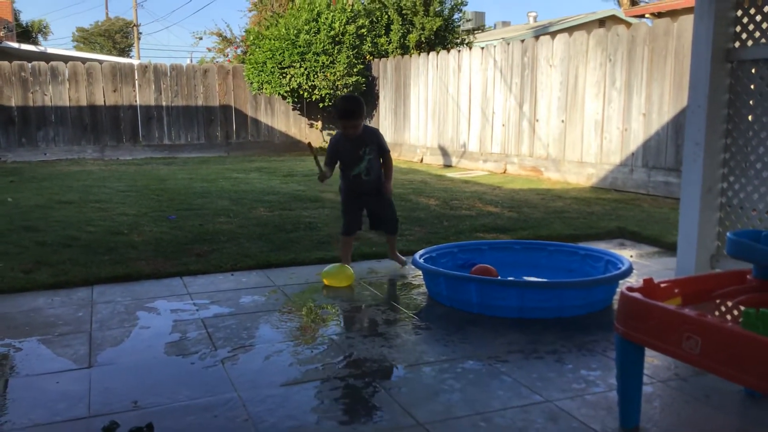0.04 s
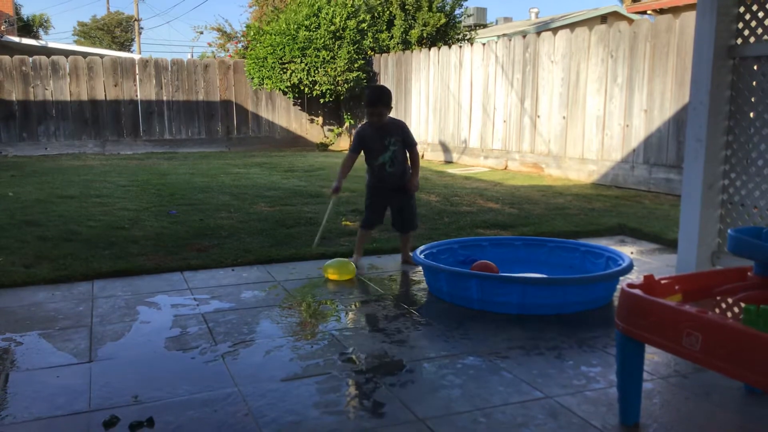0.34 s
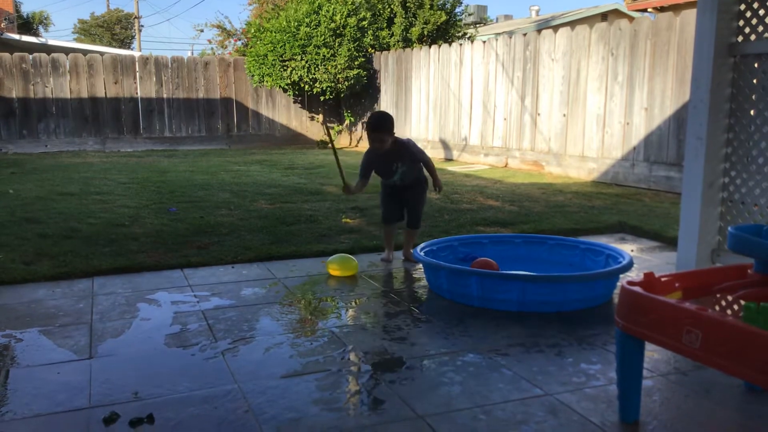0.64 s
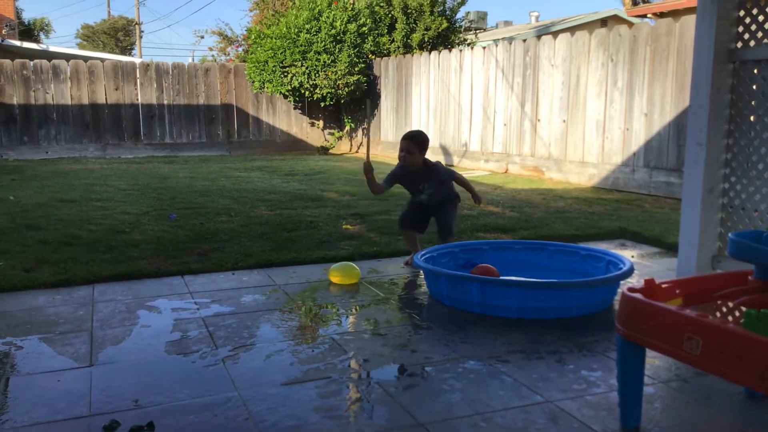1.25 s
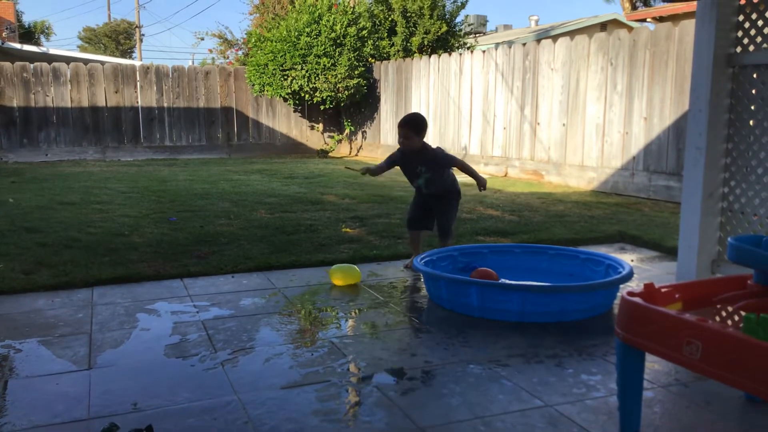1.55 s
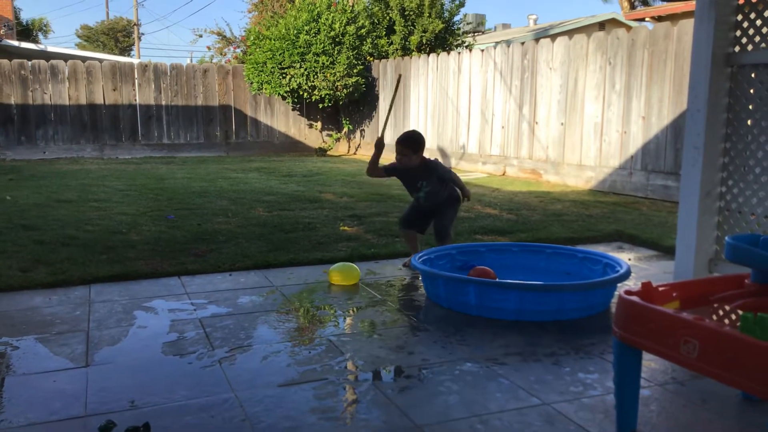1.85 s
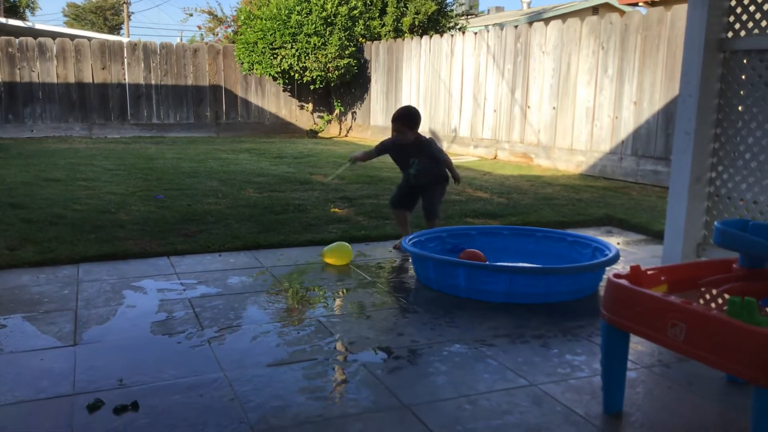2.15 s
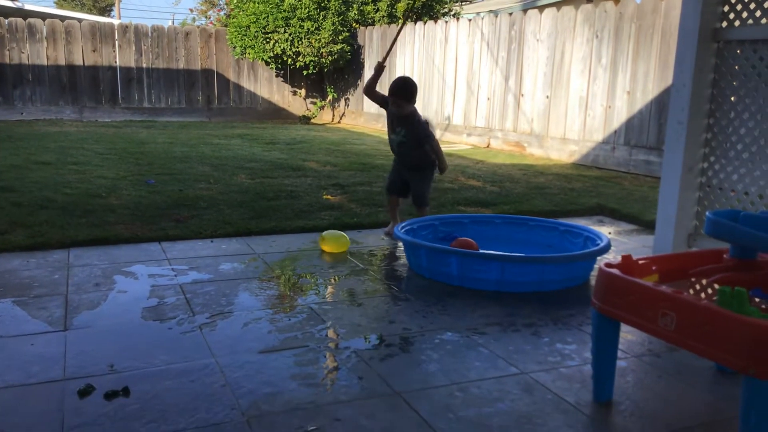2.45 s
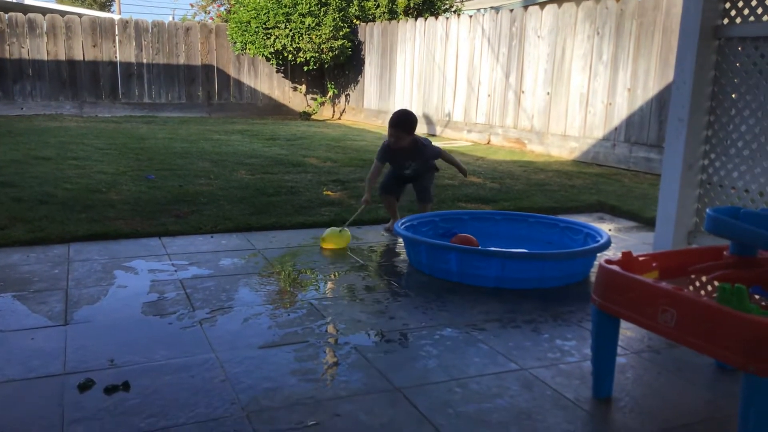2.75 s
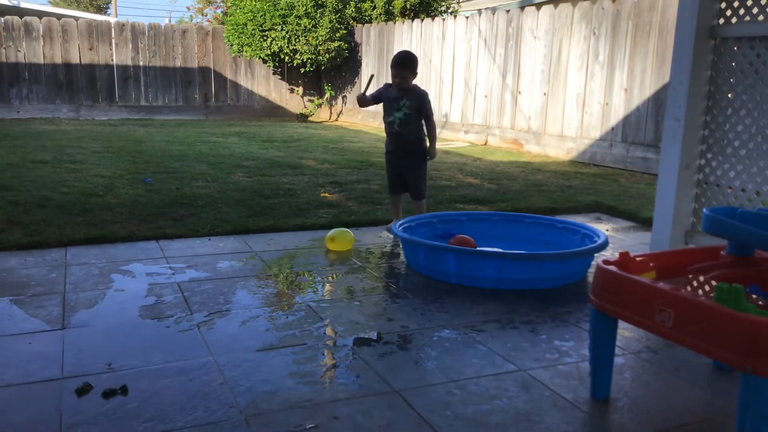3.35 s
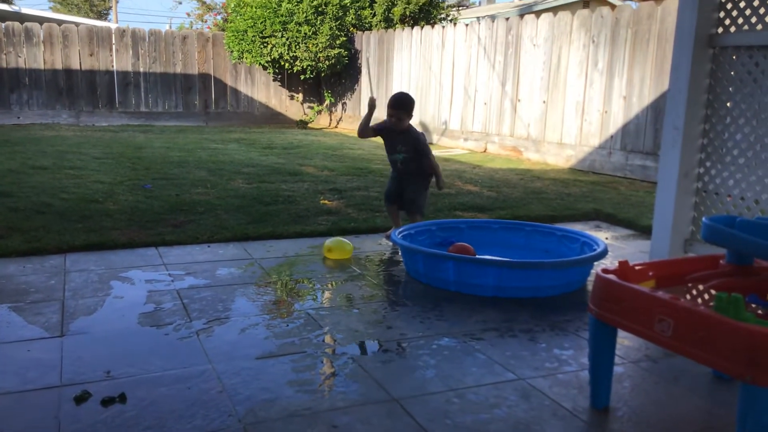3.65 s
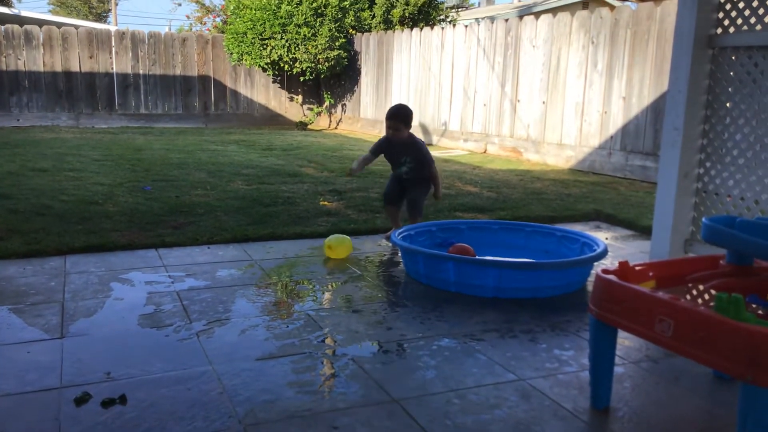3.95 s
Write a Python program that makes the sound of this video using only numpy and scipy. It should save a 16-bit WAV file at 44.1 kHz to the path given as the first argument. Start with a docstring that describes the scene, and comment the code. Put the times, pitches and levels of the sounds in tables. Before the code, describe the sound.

A stick slaps a wet patio five times, throwing small splashes in a backyard.

```python
"""A distant rumble hangs over a fenced yard, and water stirs faintly on the wet patio.
A few metres away, a stick slaps down five times beside a soft ball. Each blow cracks on the water
film, knocks the wood, pops a pocket of air and throws spray that patters back down.
A hollow bump follows each of the last two blows. House wall and patio roof answer the hits."""
import sys
import numpy as np
from scipy import signal
from scipy.fft import rfft, irfft
from scipy.io import wavfile

SR = 44100
rng = np.random.default_rng(int(sys.argv[2]) if len(sys.argv) > 2 else 0)


def unload_audio(sound):
    """Save the sound as a 16-bit wav file, at the path given as the first command line argument."""
    columns = np.transpose(np.atleast_2d(sound))
    # keep every value between -1 and 1, then stretch to whole-number steps
    steps = np.round(np.clip(columns, -1, 1) * 32767)
    wavfile.write(sys.argv[1], SR, steps.astype(np.int16))


N = 176400
TIME = np.arange(N) / SR


def amp(db):
    """Decibels to gain."""
    return 10 ** (np.asarray(db) / 20)


def unit(x):
    """Scale to rms 1."""
    return x / np.sqrt(np.mean(x ** 2) + 1e-20)


def add(out, start_s, x):
    """Mix a sound in at its cue."""
    i = int(max(start_s, 0) * SR)
    out[i:i + len(x)] += x[:max(N - i, 0)]


def cut(x, hz, kind, order=2):
    """Butterworth high- or low-pass."""
    return signal.sosfilt(signal.butter(order, min(hz, .45 * SR), kind, fs=SR, output="sos"), x + 1e-18)


def at_hz(points, hz):
    """Read every column of a spectrum table at a frequency."""
    table_hz, *columns = np.transpose(points)
    return [np.interp(np.log(hz + 1), np.log(table_hz), column) for column in columns]


def decay(t, t60_s):
    """Exponential fade, 60 dB down at t60_s."""
    return np.exp(-np.log(1000) * t / t60_s)


def ring(hz, t60_s):
    """One struck resonance: a damped sine."""
    t = TIME[:SR // 4]
    return np.sin(2 * np.pi * hz * t) * decay(t, t60_s)


# Tone of the background bed: frequency_hz, relative_level_db
BED_SPECTRUM = [(15, -69), (25, -44), (38, -24), (45, -29), (58, -6.5), (111, 1), (145, -6), (180, -4.5),
                (256, -12), (317, -13.5), (363, -14.5), (503, -17), (936, -13.5), (1840, -24), (8140, -35),
                (11000, -40.5), (16000, -46)]
# Fader ride on the bed's treble: time_s, gain_db
HISS_RIDE = [(0, -2.5), (0.7, -4.5), (1.8, -5), (2.6, -5.5), (3.4, -6.5), (4, -5.5)]


def distant_rumble(level_db=-50.5, waver_db=0.35, crossover_hz=770):
    """A bed of low noise that wavers a little, under a hiss that sinks slowly and lifts at the end."""
    spectrum_db, = at_hz(BED_SPECTRUM, np.fft.rfftfreq(N, 1 / SR))
    bed = unit(irfft(rfft(rng.standard_normal(N)) * amp(spectrum_db), N))
    rumble = cut(bed, crossover_hz, "low")
    rumble = cut(rumble[::-1], crossover_hz, "low")[::-1]  # backward pass cancels the phase shift
    hiss = bed - rumble
    waver = unit(cut(rng.standard_normal(2 * N), 11, "low")[N:])
    hiss_db = np.interp(TIME, *np.transpose(HISS_RIDE))
    return amp(level_db) * (rumble * amp(waver_db * waver) + hiss * amp(hiss_db))


def droplets(per_s, highpass_hz, spread_db=0.5):
    """A stream of tiny splats of slightly uneven size, rms 1."""
    sizes = amp(spread_db * np.minimum(rng.exponential(1, N), 4))
    polarity = rng.choice([-1, 1], N)
    landings = rng.random(N) < per_s / SR
    return unit(cut(sizes * polarity * landings, highpass_hz, "high"))


# Swells of water landing or stirring on the ground: centre_s, spread_s, level_db
SHOWERS = [(0.40, .04, -74), (0.535, 0.017, -64), (0.705, .006, -58), (0.868, 0.016, -37.5),
           (0.935, 0.018, -76), (1.06, .02, -67), (1.19, 0.013, -63), (1.506, 0.036, -50.5),
           (2.125, 0.018, -47), (2.229, 0.0057, -50.5), (2.43, 0.04, -69), (2.839, 0.0079, -38),
           (2.875, 0.055, -54), (3.0, 0.0072, -62), (3.13, 0.052, -73.5), (3.97, 0.025, -48)]


def patter(clump_db=6.5, clump_hz=130):
    """Small drops hit the wet ground in brief showers, landing in clumps."""
    swells = sum(amp(level_db) * np.exp(-.5 * ((TIME - centre_s) / spread_s) ** 2)
                 for centre_s, spread_s, level_db in SHOWERS)
    flutter = unit(cut(rng.standard_normal(N), clump_hz, "low"))
    clumps = unit(amp(clump_db * flutter))
    return swells * clumps * droplets(per_s=3700, highpass_hz=5500)


CRACK_RISE_S = 0.000254


def water_crack(length_s, highpass_hz):
    """A very short, evenly bright crackle of water squeezed off the stone."""
    t = TIME[:SR // 50]
    envelope = np.exp(-(t / length_s) ** 2) * (1 - np.exp(-t / CRACK_RISE_S)) ** 2
    noise = rng.standard_normal(len(t))
    for _ in range(2):  # flatten the spectrum while keeping the transient tight
        phase = np.angle(rfft(noise * envelope))
        noise = irfft(np.exp(1j * phase), len(t))
    crackle = cut(noise * np.sqrt(envelope), highpass_hz, "high")
    return unit(crackle) * np.sqrt(np.mean(envelope ** 2))


def wood_ring(level_db, pitch_hz, t60_s):
    """One short resonance of the struck stick, with its lows trimmed."""
    return cut(amp(level_db) * ring(pitch_hz, t60_s), pitch_hz / 2, "high")


def air_pop(level_db, pitch_hz, rise_s=0.00071):
    """A pocket of trapped air pops with a quick, hollow note."""
    attack = 1 - np.exp(-TIME[:SR // 4] / rise_s)
    note = amp(level_db) * ring(pitch_hz, t60_s=0.0071) * attack
    return cut(note, 213, "high")  # small sources radiate little bass


# Layer mix for each hit of the stick: start_s, crack_db, crack_highpass_hz, slap_db, knock_db,
# knock_hz, snap_db, pop_db, pop_hz, spray_db, spray_highpass_hz, swish_db
STICK_HITS = [(0.7776, -15.5, 4900, -26, -23, 1220, -28, -17.5, 520, -35.5, 3850, -60),
              (1.3897, -17, 4060, -25.5, -11.5, 1590, -8, -10.5, 530, -34.5, 2560, -61),
              (2.0140, -10.5, 4880, -21.5, -8, 1650, -10.5, -10, 574, -40, 3000, -32.5),
              (2.7169, -11.5, 8200, -19.5, -15, 1120, -18, -4, 700, -37, 2500, -41),
              (3.8313, -12, 3560, -19, -11.5, 1670, -8, -24.5, 633, -34, 3500, -43)]


def stick_blows(impact_s=0.0019, slap_top_hz=3080, swish_s=0.0066, swish_hz=288):
    """The stick cuts the air and lands: bright crack, dull slap, ringing wood, a pop and dying spray."""
    out, t = np.zeros(N), TIME[:SR]
    pop_send_db, wood_send_db = -3, -10  # share that reaches the walls
    air = unit(cut(cut(rng.standard_normal(N), swish_hz, "low"), swish_hz, "high"))
    for (start_s, crack_db, crack_highpass_hz, slap_db, knock_db, knock_hz, snap_db,
         pop_db, pop_hz, spray_db, spray_highpass_hz, swish_db) in STICK_HITS:
        water, pop, wood = np.zeros((3, SR))
        spray = droplets(per_s=11000, highpass_hz=spray_highpass_hz)[:SR]
        water += amp(spray_db) * spray * decay(t, t60_s=0.27)
        add(water, 0, amp(crack_db) * water_crack(impact_s, crack_highpass_hz))
        slap = cut(water_crack(impact_s, highpass_hz=840), slap_top_hz, "low")
        add(water, 0, amp(slap_db) * slap * np.sqrt(SR / 2 / slap_top_hz))  # make-up for the lost top
        add(wood, CRACK_RISE_S, wood_ring(knock_db, knock_hz, t60_s=0.0075))
        add(wood, CRACK_RISE_S, wood_ring(snap_db, pitch_hz=4880, t60_s=0.0031))
        add(pop, 0.00082, air_pop(pop_db, pop_hz))
        reverb = yard(water + amp(pop_send_db) * pop + amp(wood_send_db) * wood)
        add(out, start_s, water + pop + wood + reverb)
        out += amp(swish_db) * air * np.exp(-((TIME - start_s) / swish_s) ** 2)
    return out


# Early reflections off the hard surfaces: delay_s, level_db, lowpass_hz
REFLECTIONS = [(.0031, -13.5, 9000), (.0094, -18, 2500), (.0118, -18.5, 12400), (.0290, -19, 3000),
               (.0440, -5, 1500)]
# Diffuse reverb of the yard: frequency_hz, level_db, t60_s
YARD_REVERB = [(148, 5.5, 0.63), (324, 0.5, 0.28), (707.3, -3, 0.53), (1580, 0, 0.53), (2800, 2, 0.56),
               (5020, -2, 0.41), (9700, -6.5, 0.29), (16100, -18, 0.64)]


def yard(x, scatter_db=3.5, scatter_t60_s=0.095, rise_s=0.0035):
    """Dull reflections, quick scatter off nearby things and a tail that dies band by band."""
    t = TIME[:SR * 3 // 4]
    response, edges_hz = np.zeros(len(t)), np.geomspace(90, 18000, 17)
    for low_hz, high_hz in zip(edges_hz, edges_hz[1:]):
        level_db, t60_s = at_hz(YARD_REVERB, np.sqrt(low_hz * high_hz))
        bandpass = signal.butter(2, [low_hz, high_hz], "band", fs=SR, output="sos")
        scatter = amp(scatter_db) * unit(decay(t, scatter_t60_s))
        envelope = np.hypot(unit(decay(t, t60_s)), scatter) * (1 - np.exp(-t / rise_s))
        band = unit(signal.sosfilt(bandpass, rng.standard_normal(len(t)) * envelope))
        band_share = np.sqrt(2 * (high_hz - low_hz) / SR / len(t))
        response += amp(level_db) * np.hypot(1, amp(scatter_db)) * band * band_share
    for delay_s, level_db, lowpass_hz in REFLECTIONS:
        bounce = signal.unit_impulse(len(t), int(delay_s * SR))
        response += amp(level_db) * cut(bounce, lowpass_hz, "low", order=1)
    return signal.fftconvolve(x, response)[:len(x)]


# Sharp accents after the hits: start_s, level_db, highpass_hz
DROP_TICKS = [(0.9129, -17.5, 1740), (0.9487, -32, 7000), (1.4589, -23, 2000), (1.5117, -26, 3000),
              (1.5856, -31.5, 6000), (2.1036, -26, 9050), (2.142, -25.5, 3000), (2.1688, -22.5, 1070),
              (2.8347, -30, 6000), (2.8603, -29, 5000), (2.8837, -31, 6000), (3.9521, -20.5, 7340)]


def ticks(length_s=0.00095):
    """Big drops and the stick's tip click on the wet stone."""
    out = np.zeros(N)
    for start_s, level_db, highpass_hz in DROP_TICKS:
        add(out, start_s, amp(level_db) * water_crack(length_s, highpass_hz))
    return out


# Soft thuds after the last two hits: start_s, level_db, pitch_hz, t60_s, low_mode_db
SOFT_BUMPS = [(2.784, -12.5, 396, 0.029, -21), (3.8770, -15, 289, 0.038, -9)]


def hollow_bumps(rise_s=0.0048, low_mode_ratio=0.61, scuff_db=-8, scuff_top_hz=680):
    """A soft contact swells into two low rings, with a dull scuff."""
    out, t = np.zeros(N), TIME[:SR // 4]
    attack = 1 - np.exp(-t / rise_s)
    for start_s, level_db, pitch_hz, t60_s, low_mode_db in SOFT_BUMPS:
        dull_noise = unit(cut(rng.standard_normal(len(t)), scuff_top_hz, "low"))
        scuff = amp(scuff_db) * dull_noise * decay(t, t60_s)
        low_mode = amp(low_mode_db) * ring(pitch_hz * low_mode_ratio, t60_s / low_mode_ratio)
        body = ring(pitch_hz, t60_s) + low_mode
        add(out, start_s, amp(level_db) * (body + scuff) * attack)
    return cut(out, 140, "high")  # small objects radiate little bass


def scene():
    """Mono mix of blows, water and bumps with their yard reverb, over the rumble."""
    water_send_db, bump_send_db = -5.5, -6.5
    water = patter() + ticks()
    bumps = hollow_bumps()
    reverb = yard(amp(water_send_db) * water + amp(bump_send_db) * bumps)
    return (stick_blows() + water + bumps + reverb + distant_rumble())[None]


# Colour of the microphone: frequency_hz, gain_db
MIC_EQ = [(100, -0.5), (1000, 3), (3000, -0.5), (5000, 1.5), (6300, -0.5), (7200, -3), (8300, 0),
          (11000, 4), (14000, -1), (16000, -5.5)]


def record(dry):
    """Microphone colour, a soft clip that rounds the sharpest peaks, then a steep cut of the top."""
    clip_level, cutoff_hz = 0.43, 16000
    eq_db, = at_hz(MIC_EQ, np.fft.rfftfreq(2 * N, 1 / SR))
    coloured = irfft(rfft(dry, 2 * N) * amp(eq_db))[:, :N]
    rounded = clip_level * np.tanh(coloured / clip_level)
    return signal.sosfilt(signal.ellip(10, .2, 80, cutoff_hz, fs=SR, output="sos"), rounded)


dry = scene()
out = record(dry)
unload_audio(out)
```